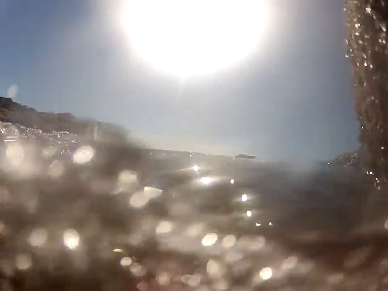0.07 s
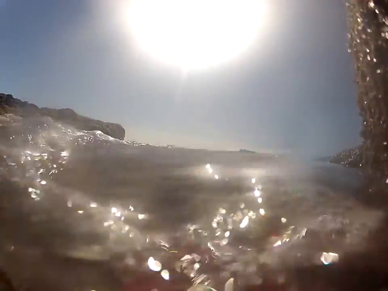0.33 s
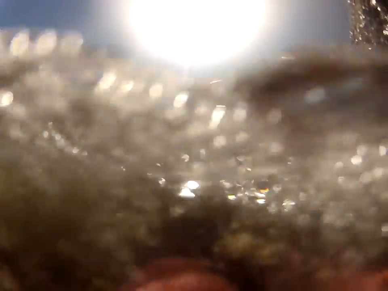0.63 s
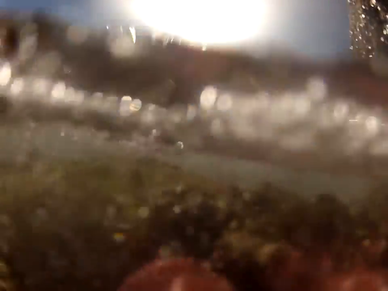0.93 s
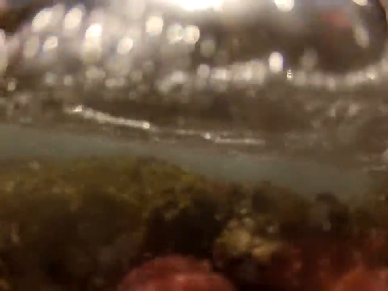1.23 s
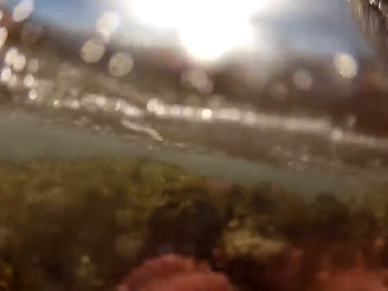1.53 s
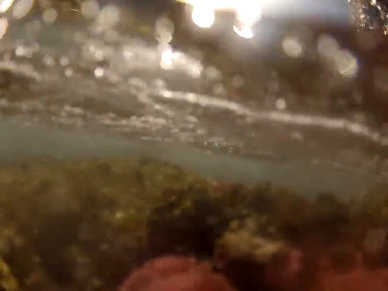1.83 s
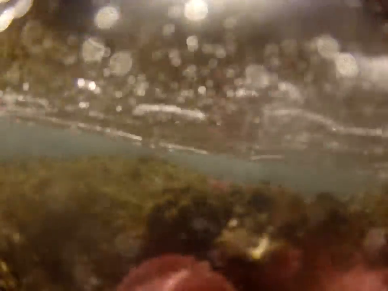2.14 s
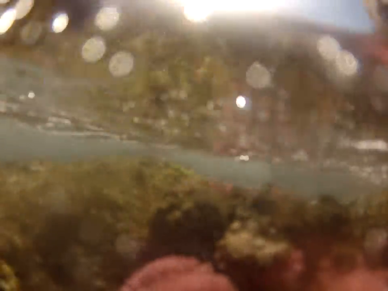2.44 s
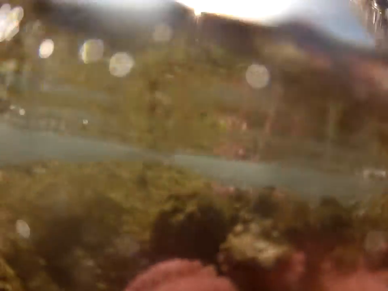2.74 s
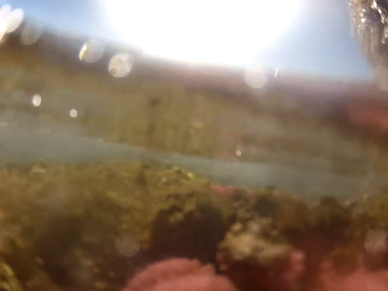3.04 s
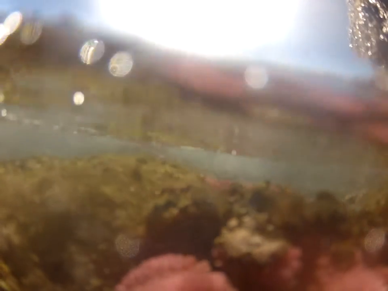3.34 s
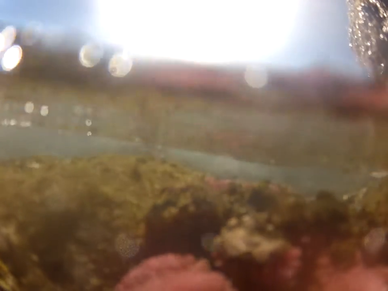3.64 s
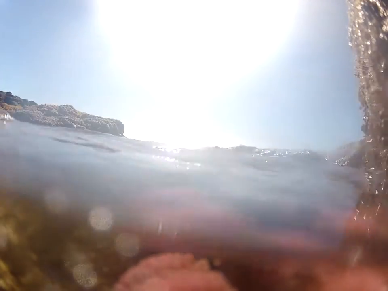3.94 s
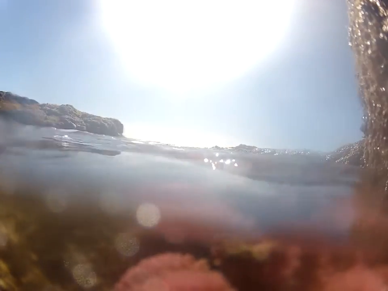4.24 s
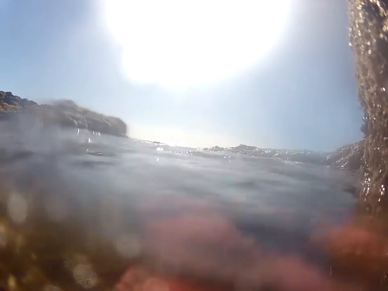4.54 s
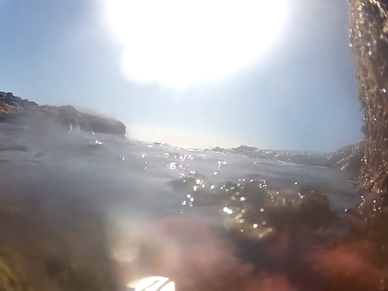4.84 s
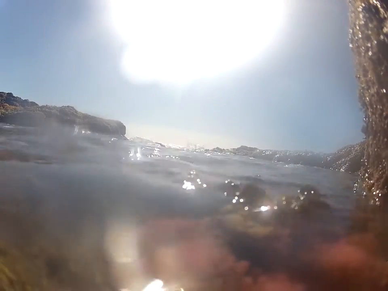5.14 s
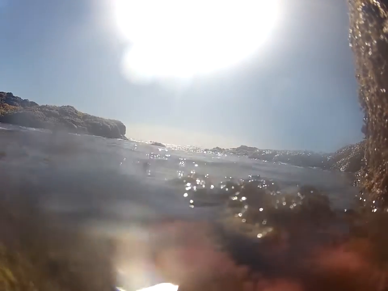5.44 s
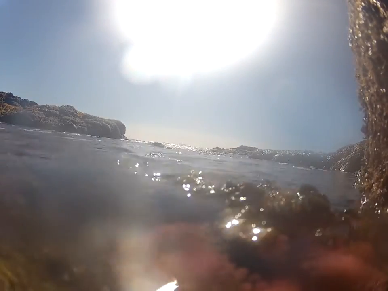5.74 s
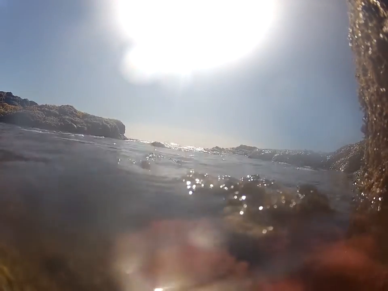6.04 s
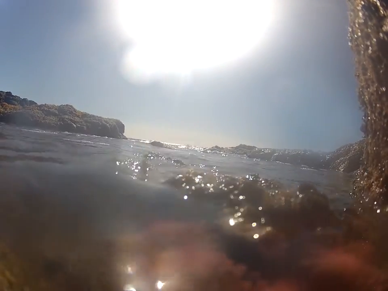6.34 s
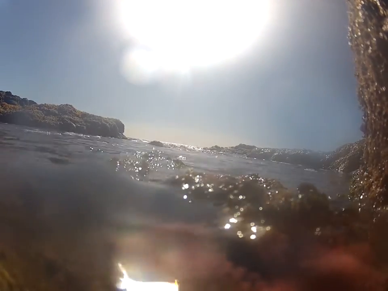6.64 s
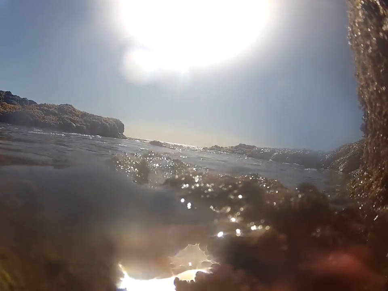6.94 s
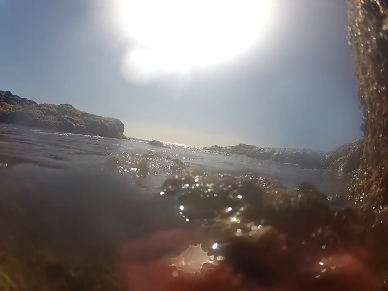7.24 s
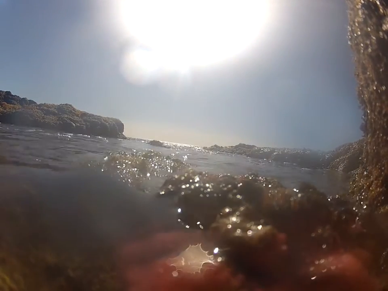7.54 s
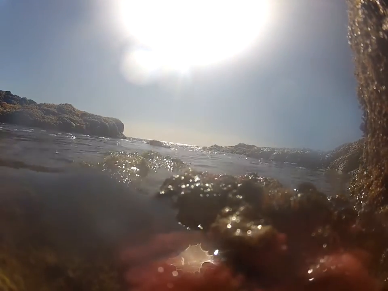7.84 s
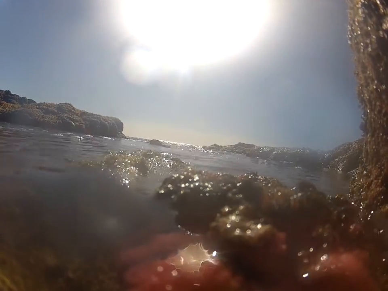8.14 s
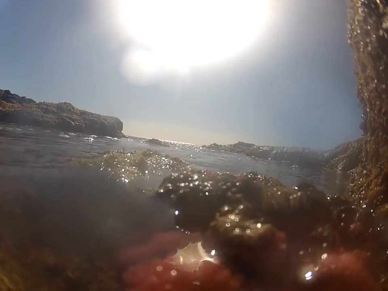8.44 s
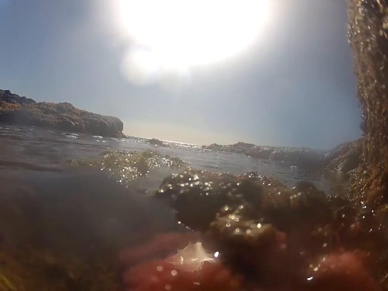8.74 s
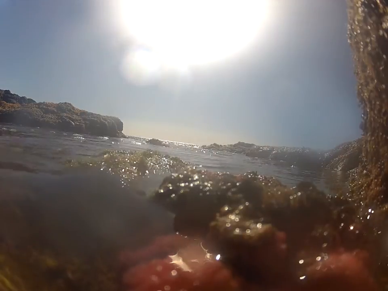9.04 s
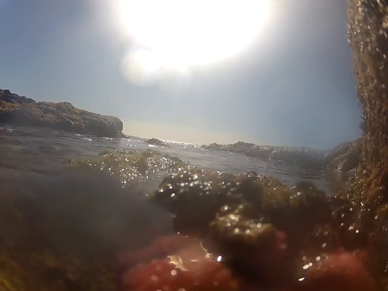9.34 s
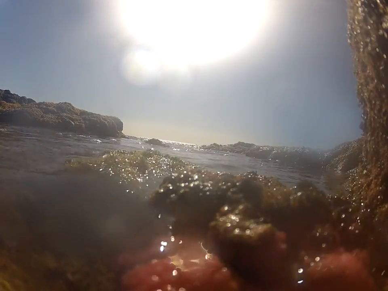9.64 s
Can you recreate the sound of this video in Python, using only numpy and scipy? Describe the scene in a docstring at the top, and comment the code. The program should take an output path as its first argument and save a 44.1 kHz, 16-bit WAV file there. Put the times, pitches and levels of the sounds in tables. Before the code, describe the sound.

Seawater sloshes, gurgles and pops right at the microphone in a rocky tide pool, then drains to faint fizzing foam and distant surf.

```python
"""A wave washes over a camera at the waterline of a rocky tide pool: the water heaves and fizzes,
bubbles pop and gulp right at the microphone, and slaps of water knock on the housing.
After about four seconds the pool drains off the microphone port, foam fizzes out on the rocks,
and the surf further off is left. The recorder holds each sample at a low rate,
which mirrors the sound into a thin, glassy treble."""
import sys
import numpy as np
from scipy import signal
from scipy.fft import rfft, irfft
from scipy.io import wavfile

SR = 44100
rng = np.random.default_rng(int(sys.argv[2]) if len(sys.argv) > 2 else 0)


def unload_audio(sound):
    """Save the sound as a 16-bit wav file, at the path given as the first command line argument."""
    columns = np.transpose(np.atleast_2d(sound))
    # keep every value between -1 and 1, then stretch to whole-number steps
    steps = np.round(np.clip(columns, -1, 1) * 32767)
    wavfile.write(sys.argv[1], SR, steps.astype(np.int16))


N = 426887
TIME = np.arange(N) / SR
DRAIN_AT_S, DRAIN_TAKES_S = 4.27, 0.63  # the water runs off the port and the rocks
SLOSH_RISE_S, SLOSH_FALL_S = 0.04, 0.03
RING_CYCLES = 2.65  # a ringing bubble's decay time, in cycles


def amp(db):
    """Decibels to gain."""
    return 10 ** (np.asarray(db) / 20)


def unit(x):
    """Scales to an rms of 1."""
    return x / np.sqrt(np.mean(x ** 2) + 1e-20)


def curve(rows):
    """Joins (time_s, value) rows by straight lines."""
    return np.interp(TIME, *np.transpose(rows))


def ramp(start_s, length_s):
    """Goes from 0 to 1 over the length."""
    return np.clip((TIME - start_s) / length_s, 0, 1)


def swell(start_s, length_s, rise_s, fall_s):
    """Gain that builds up to the start, holds for the length and dies away."""
    return np.exp(np.minimum(TIME - start_s, 0) / rise_s - np.maximum(TIME - start_s - length_s, 0) / fall_s)


def dying(start_db, db_per_s):
    """Gain that falls steadily from the start."""
    return amp(start_db - db_per_s * TIME)


def drift(rate_hz):
    """Slow random wander of rms 1."""
    hz = np.fft.rfftfreq(N, 1 / SR)
    return unit(irfft(rfft(rng.standard_normal(N)) / (1 + (hz / rate_hz) ** 2), N))


def colour(x, points):
    """Filters by a relative (freq_hz, gain_db) shape; causal, so that clicks keep a sharp front."""
    size = 4096
    hz, db = np.transpose(points)
    log_hz = np.log(abs(np.fft.fftfreq(size, 1 / SR)) + 1)
    log_gain = np.log(amp(np.interp(log_hz, np.log(hz), db)))
    minimum_phase = np.exp(np.conj(signal.hilbert(log_gain)))
    taps = np.fft.ifft(minimum_phase).real[:size // 2]
    return signal.oaconvolve(x, taps / np.linalg.norm(taps))[:len(x)]


def add(mix, start_s, sound):
    """Mixes a sound in at its start time."""
    part = mix[max(round(start_s * SR), 0):][:len(sound)]
    part += sound[:len(part)]


def ring(hz, decay_s, onset_cycles, glide):
    """A sine that swells and dies away, gliding by a share of its pitch."""
    t = TIME[:SR // 25]
    envelope = (1 - np.exp(-(t * hz / onset_cycles) ** 2)) * np.exp(-t / decay_s)
    pitch_hz = hz * (1 + glide * np.tanh(t / decay_s / 2))
    return envelope / envelope.max() * np.sin(2 * np.pi * np.cumsum(pitch_hz) / SR)


def swarm(per_s, low_hz, high_hz, cycles, spread_db, sizes=24):
    """A cloud of bubbles, most of them faint, each climbing in pitch as it nears the surface."""
    out = np.zeros(N)
    for hz in np.geomspace(low_hz, high_hz, sizes):
        births_s = np.flatnonzero(rng.random(N) < per_s / sizes / SR) / SR
        bubble = ring(hz, cycles / hz, onset_cycles=0.25, glide=0.14)
        bubble /= np.linalg.norm(bubble)
        for start_s, (strength, polarity) in zip(births_s, rng.random((4096, 2))):
            add(out, start_s, np.sign(polarity - 0.5) * amp(spread_db * strength ** 2) * bubble)
    return unit(out)


def port_cover(flood_at_s=-0.075, flood_takes_s=0.83, least=0.017):
    """Share of the microphone port under water, which climbs over it, stays and runs off."""
    under = ramp(flood_at_s, flood_takes_s) - ramp(DRAIN_AT_S, DRAIN_TAKES_S)
    return least + (1 - least) * under


# Contour of the heave, right against the housing: time_s, relative_db
HEAVE_CONTOUR = [(0.0, -36), (0.13, -49), (1.48, -55.5), (3.61, -53.5), (4.31, -58.5), (7.68, -61),
                 (7.9, -62.5), (9.38, -61), (9.68, -71)]
# Its deep tone: freq_hz, gain_db
HEAVE_TONE = [(10, -7), (27, 6.5), (50, 0), (85, -5), (130, -12), (250, -15), (500, -41), (1500, -79)]


def heave(gain_db=2.5, lumps_db=3.5):
    """Lumpy low pressure of water swaying against the housing."""
    rumble = unit(colour(rng.standard_normal(N), HEAVE_TONE))
    return rumble * amp(curve(HEAVE_CONTOUR) + lumps_db * drift(rate_hz=3) + gain_db)


# Contour of the surf, some way beyond the pool: time_s, relative_db
SURF_CONTOUR = [(0.0, -52.5), (0.21, -57.5), (0.65, -53.5), (0.91, -59.5), (1.29, -56), (1.67, -59),
                (2.56, -57), (3.12, -59), (4.26, -59.5), (5.63, -56), (6.17, -58.5), (9.68, -56.5)]
# Its tone through a flooded microphone port and an open one: freq_hz, gain_db
SURF_FLOODED = [(100, 5), (300, 3.5), (550, -5), (950, -5.5), (1150, -11), (1550, -6.5), (1950, 2.5),
                (2150, -4.5), (2450, -5), (3000, -15.5), (3700, -13.5), (4400, -20), (5300, -20.5),
                (6000, -29.5)]
SURF_OPEN = [(100, 1), (270, 1.5), (480, -3.5), (640, -7), (760, -2), (880, -9), (990, -6), (1130, -2),
             (1300, -11), (1720, -14), (2000, -7), (2320, 1), (2750, -16), (3700, -22), (4800, -23),
             (6000, -36)]


def surf(gain_db=2.0, flutter_db=2.54):
    """The steady wash of the sea; a film of water over the port lowers and blurs its resonances."""
    roar = rng.standard_normal(N) * amp(flutter_db * drift(rate_hz=46))
    covered = port_cover()
    flooded = np.sqrt(covered) * colour(roar, SURF_FLOODED)
    in_air = np.sqrt(1 - covered) * colour(rng.standard_normal(N), SURF_OPEN)
    return (flooded + in_air) * amp(curve(SURF_CONTOUR) + gain_db)


# Sloshes folding over close to the microphone: start_s, length_s, level_db
SLOSHES = [(0.041, .17, -39.5), (0.38, 0.09, -45), (0.593, 0.12, -46.5), (2.514, 0.039, -50),
           (2.892, 0.083, -51)]
# Tone of their gurgle: freq_hz, gain_db
CHURN_TONE = [(40, 0), (120, -5), (250, -1.5), (410, 1), (600, -9.5), (800, -8.5), (1020, -1.5),
              (1350, -10), (2500, -52), (6000, -53)]


def churn():
    """Large, heavily damped bubbles gurgle with each slosh, and faintly in between."""
    gurgle = swarm(per_s=650, low_hz=110.4, high_hz=1106, cycles=1.46, spread_db=12.0)
    sloshes = sum(amp(db) * swell(start_s, length_s, SLOSH_RISE_S, SLOSH_FALL_S)
                  for start_s, length_s, db in SLOSHES)
    settling = dying(start_db=-62.5, db_per_s=1.25)
    return unit(colour(gurgle, CHURN_TONE)) * np.hypot(sloshes, settling)


# Tone of a bubble's film bursting at the port: freq_hz, gain_db
SNAP_TONE = [(100, -17), (700, 9), (1300, -6.5), (1900, 5), (2500, 7.5), (3150, -16), (3700, 7),
             (4400, -7.5), (5300, -4), (6000, -7)]


def crackle():
    """Tiny bubbles burst close by, most after the first wave and in a spatter as the camera surfaces."""
    bursts = swarm(per_s=340, low_hz=1290, high_hz=5020, cycles=1.0, spread_db=14.0)
    wave = dying(start_db=-48.5, db_per_s=11.8)
    spatter = amp(-65) * swell(start_s=4.0, length_s=0.13, rise_s=SLOSH_RISE_S, fall_s=SLOSH_FALL_S)
    settling = dying(start_db=-72, db_per_s=0.68)
    return unit(colour(bursts, SNAP_TONE)) * np.hypot(wave + spatter, settling)


# Sheets of foam spreading and bursting on the pool: start_s, length_s, level_db
FOAM_SHEETS = [(2.497, 0.075, -56), (2.904, 0.086, -54.5), (5.36, 0.56, -59.5), (5.428, 0.042, -63)]
# Tone of the fizz through a flooded port and an open one: freq_hz, gain_db
FOAM_FLOODED = [(200, -24), (1400, -14), (1900, -4.5), (2500, 5), (2900, -9), (3300, -12), (3650, -5),
                (4300, -26), (6000, -21)]
FOAM_OPEN = [(200, -8), (1000, -10.5), (1650, -2), (2000, 3), (2500, 5.5), (3100, -8.5), (3600, 3.5),
             (4050, 0.5), (4400, -7.5), (4700, -2), (5300, -11.5), (6000, -41)]


def foam(rise_share=0.9, fall_share=0.18, rocks_db=-64, rocks_db_per_s=2):
    """Dense bubbles fizz after the wave, in sheets and on the drained rocks; duller under water."""
    fizz = swarm(per_s=6000, low_hz=1212, high_hz=5480, cycles=3.1, spread_db=19.5)
    covered = port_cover()
    flooded = covered * unit(colour(fizz, FOAM_FLOODED))
    in_air = (1 - covered) * unit(colour(fizz, FOAM_OPEN))
    wave = dying(start_db=-51.5, db_per_s=16)
    sheets = sum(amp(db) * swell(start_s, length_s, rise_share * length_s, fall_share * length_s)
                 for start_s, length_s, db in FOAM_SHEETS)
    rocks = ramp(DRAIN_AT_S, DRAIN_TAKES_S) * amp(rocks_db - rocks_db_per_s * (TIME - DRAIN_AT_S))
    return (flooded + in_air) * np.hypot(wave + sheets, rocks)


def plinks():
    """Faint bubbles ring at scattered pitches, less strongly as the pool settles."""
    bubbles = swarm(per_s=30, low_hz=1780, high_hz=3970, cycles=RING_CYCLES, spread_db=9.5)
    return bubbles * dying(start_db=-61, db_per_s=2.36)


# The loudest bubbles, right at the microphone, several at once in a gulp: start_s, relative_db, pitch_hz
CLOSE_BUBBLES = [(0.0284, -35, 1880), (.1145, -15.5, 2400), (.1203, -30, 2500), (0.225, -32.5, 2540),
                 (0.4033, -32, 2080), (0.414, -29, 2500), (0.424, -23.5, 2150), (.513, -32.5, 2010),
                 (0.5928, -29.5, 2050), (.6294, -29.5, 2450), (0.6492, -26, 835), (0.6486, -25.5, 1790),
                 (0.708, -35.5, 3600), (.774, -34.5, 1910), (0.8273, -32.5, 2360), (0.905, -36.5, 4960),
                 (1.0176, -35, 2360), (1.106, -37, 3960), (1.2333, -27, 2400), (1.3835, -33.5, 3980),
                 (1.5158, -34, 2340), (1.9342, -34, 1970), (2.108, -28.5, 1650), (2.115, -18, 870),
                 (2.1148, -27, 1480), (2.1301, -25, 3400), (2.1324, -10.5, 810), (2.132, -22.5, 1680),
                 (2.1334, -21, 1250), (2.1304, -24, 2380), (2.6869, -29.5, 2450), (2.6861, -18.5, 870),
                 (2.7303, -29, 2280), (2.8998, -36, 3580), (3.068, -36, 2760), (3.1394, -34.5, 805),
                 (3.1397, -32, 1680), (3.1464, -39.5, 5200), (3.2644, -34, 3800), (3.3421, -27.5, 2460),
                 (3.4381, -42, 1920), (4.006, -40, 2670), (4.2566, -41.5, 2290), (4.2568, -44.5, 3680),
                 (4.5359, -44.5, 2850), (4.671, -37.5, 2230), (4.6838, -39, 1990), (8.149, -42.5, 2710),
                 (8.201, -43, 2270), (8.766, -44, 2800)]


def pops(ring_db=-1, snap_db=-10, snap_limit_db=-30, snap_decay_s=0.0017, full_snap_hz=2100):
    """Bubbles at the port ring for a few cycles; the small ones also snap as their film breaks."""
    rings, snaps, t = np.zeros(N), np.zeros(N), TIME[:SR // 100]
    for start_s, db, hz in CLOSE_BUBBLES:
        cycles = RING_CYCLES * (hz / 2000) ** 0.39  # small, high bubbles last a few more cycles
        add(rings, start_s, amp(db) * ring(hz, cycles / hz, onset_cycles=0.71, glide=0.014))
        # a film holds only so much tension, so the snap stops growing with the bubble
        strength = amp(min(db, snap_limit_db)) * min(hz / full_snap_hz, 1) ** 4
        add(snaps, start_s, strength * rng.standard_normal(len(t)) * np.exp(-t / snap_decay_s))
    return amp(ring_db) * rings + amp(snap_db) * colour(snaps, SNAP_TONE)


# Water slapping the housing around the microphone: start_s, level_db, pitch_hz
HOUSING_KNOCKS = [(.0292, -29, 453), (0.1145, -19.5, 229), (.203, -26.5, 260), (0.373, -29.5, 60.6),
                  (.424, -22, 333), (0.595, -25, 360), (.652, -26, 187), (1.177, -34, 144),
                  (1.725, -38.5, 155), (2.1153, -16, 317), (2.134, -23, 437), (2.508, -31.5, 320),
                  (2.592, -30.5, 396), (2.689, -21.5, 229), (2.733, -30.5, 282), (3.071, -35, 170),
                  (3.2648, -24.5, 318), (3.343, -32, 320), (3.762, -33, 70), (3.83, -35.5, 110),
                  (3.946, -39, 111), (4.021, -36, 328), (4.671, -38.5, 278), (4.983, -27.5, 102),
                  (5.43, -38.5, 60), (6.196, -40, 70), (6.471, -40.5, 65), (6.87, -39, 60),
                  (7.21, -39, 64.7), (9.338, -35.5, 60)]


def knocks(cycles=0.57, recoil_db=-15):
    """Each slap of water pushes the housing once, and the water sways back slowly."""
    out = np.zeros(N)
    recoil = amp(recoil_db) * ring(hz=42, decay_s=0.021, onset_cycles=0.15, glide=0)
    fade_out = signal.windows.tukey(2 * len(recoil), 0.3)[len(recoil):]
    for start_s, db, hz in HOUSING_KNOCKS:
        push = ring(hz, cycles / hz, onset_cycles=0.089, glide=-0.057)
        add(out, start_s, amp(db) * (push - recoil) * fade_out)
    return out


# Films of water breaking on the port itself: start_s, level_db
FILM_TICKS = [(0.0295, -30), (0.4234, -26), (0.434, -20), (.604, -29), (0.6492, -25), (2.1154, -31),
              (3.5039, -36.5), (4.1023, -38), (4.1595, -37), (6.974, -36)]


def ticks(hz=3300, cycles=0.56):
    """A breaking film is one sharp swing of pressure, without ringing."""
    out = np.zeros(N)
    tick = ring(hz, cycles / hz, onset_cycles=0.33, glide=0)
    for start_s, db in FILM_TICKS:
        add(out, start_s, amp(db) * tick)
    return out


def scene():
    """One microphone at the waterline feeds both channels."""
    water = heave() + surf() + churn() + crackle() + foam() + plinks() + pops() + knocks() + ticks()
    return np.array([water, water])


# Tone of the faint hiss in each recorder channel: freq_hz, gain_db
HISS_TONE = [(50, 4.5), (250, 10.5), (800, -5), (2200, -20), (4000, 0), (6000, -11), (8000, -8),
             (10000, -46)]


def record(dry, overload_db=-12, hold_hz=12000, hiss_db=-79, top_hz=15400):
    """Sample and hold mirrors the low band round the hold rate; then come hiss and the band limit."""
    rounded = amp(overload_db) * np.tanh(dry / amp(overload_db))  # the nearest gulps overload softly
    anti_alias = signal.firwin(161, hold_hz / 2 - 60, fs=SR)
    low_band = signal.oaconvolve(rounded, anti_alias[None], "same")
    mirrored = low_band * (1 + 2 * np.cos(2 * np.pi * hold_hz * TIME))
    hz = np.fft.rfftfreq(N, 1 / SR)
    # the mirror images are weakest near the hold rate
    droop = np.where(hz < hold_hz / 2, 1, abs(hz - hold_hz) / (hz + 1))
    held = irfft(rfft(mirrored) * droop, N)
    hiss = np.array([colour(noise, HISS_TONE) for noise in rng.standard_normal(dry.shape)])
    band_limit = signal.firwin(255, top_hz, window=("kaiser", 9), fs=SR)
    return signal.oaconvolve(held + amp(hiss_db) * hiss, band_limit[None], "same")


dry = scene()
out = record(dry)
unload_audio(out)
```